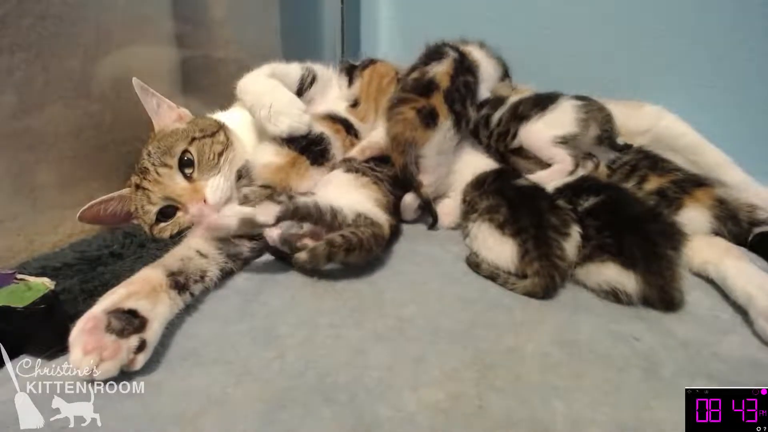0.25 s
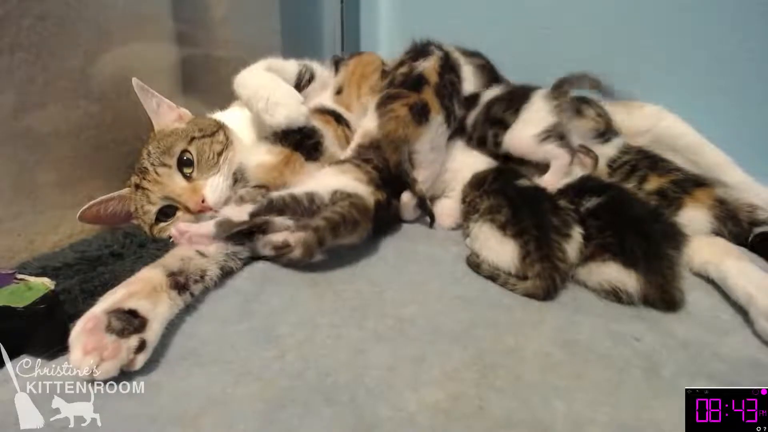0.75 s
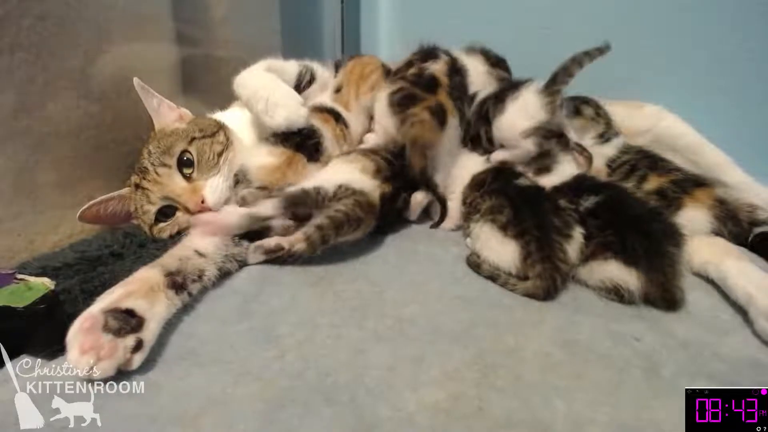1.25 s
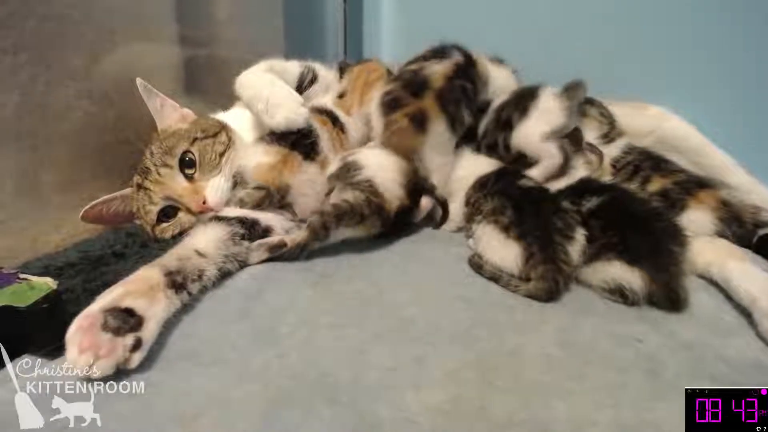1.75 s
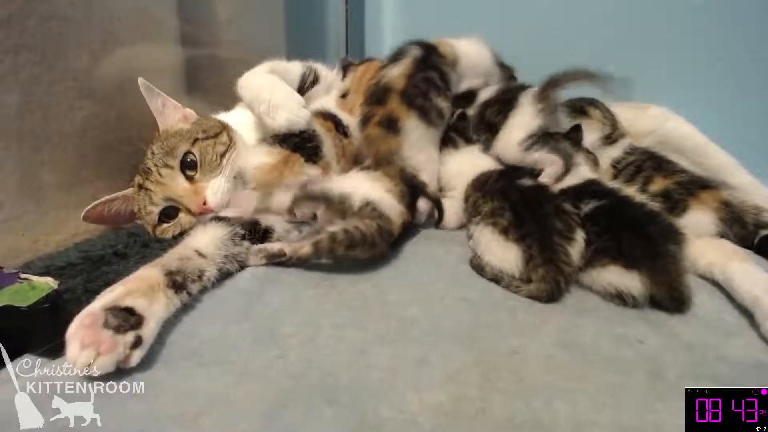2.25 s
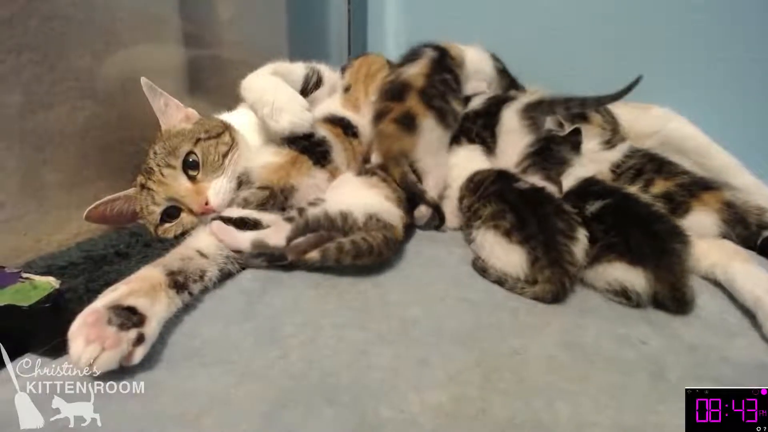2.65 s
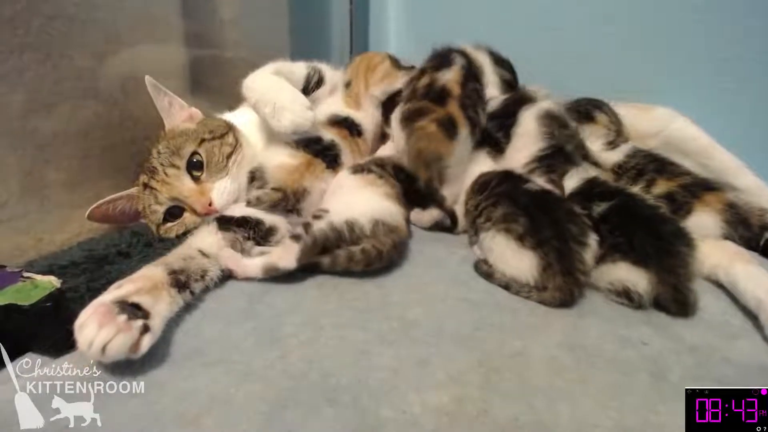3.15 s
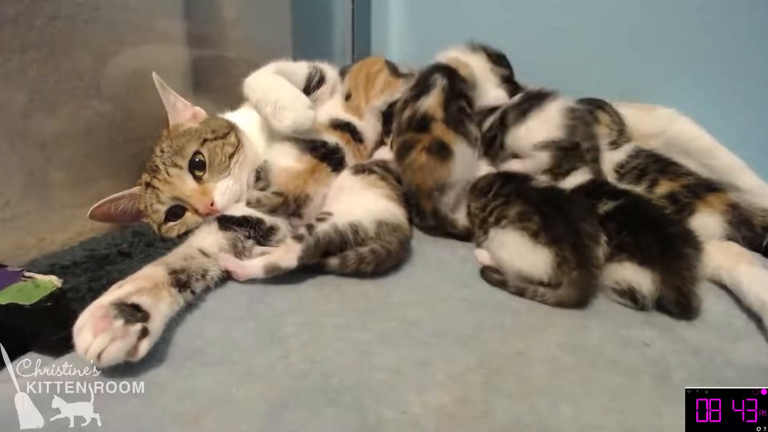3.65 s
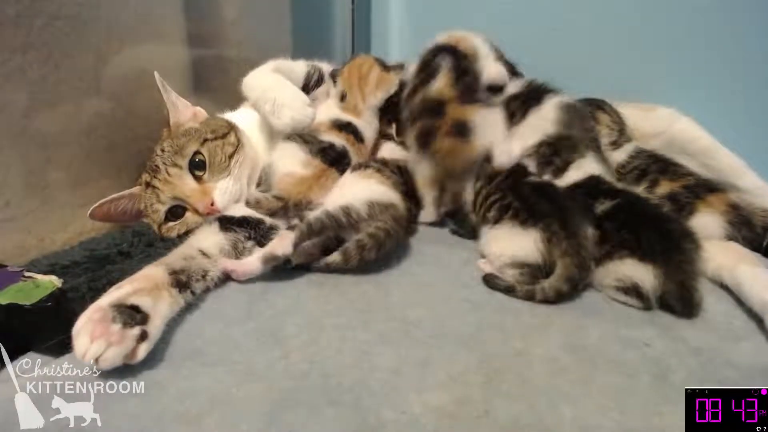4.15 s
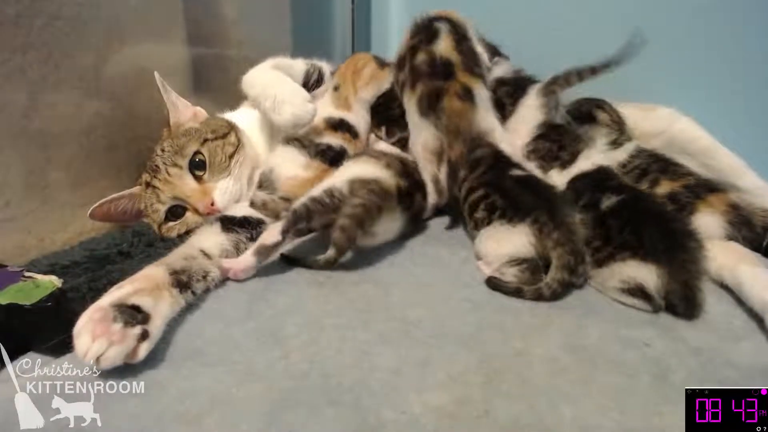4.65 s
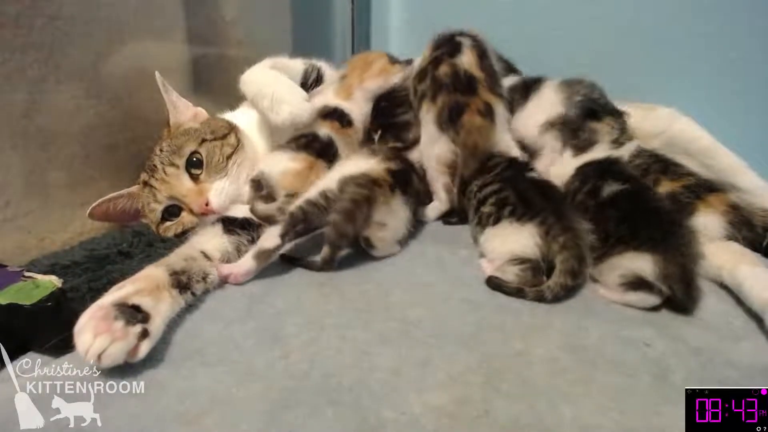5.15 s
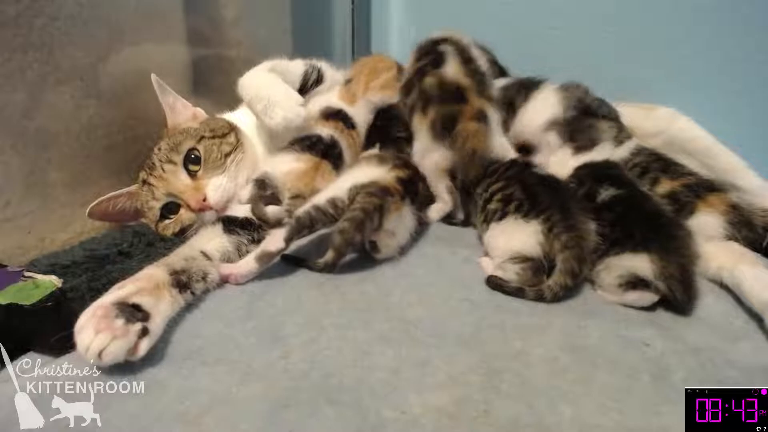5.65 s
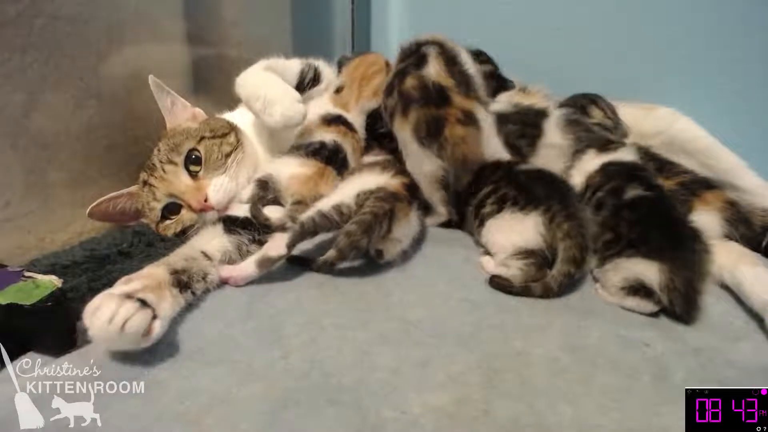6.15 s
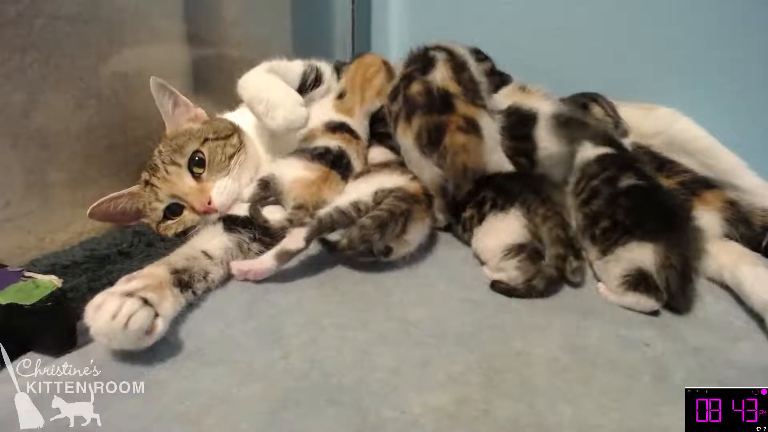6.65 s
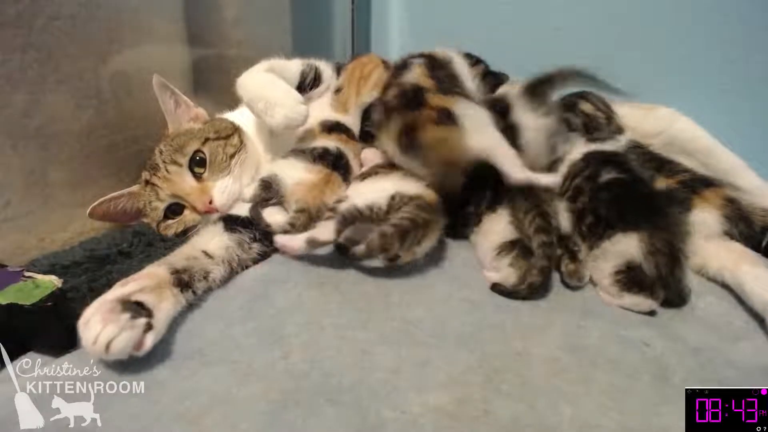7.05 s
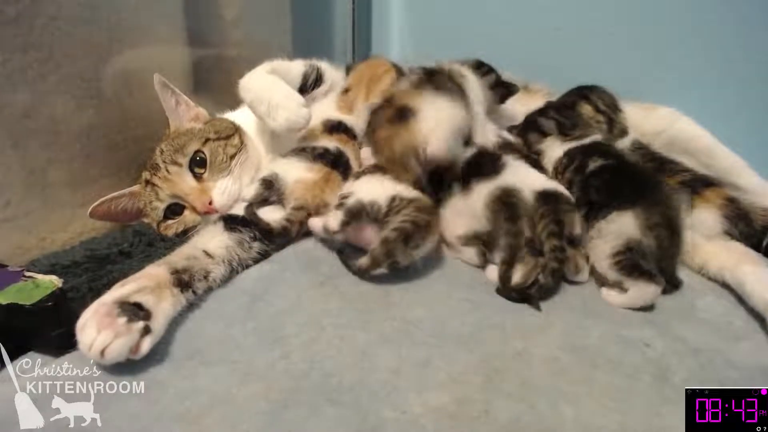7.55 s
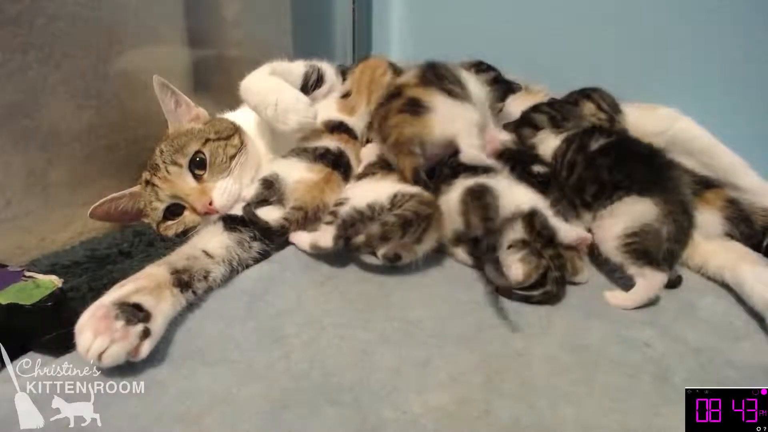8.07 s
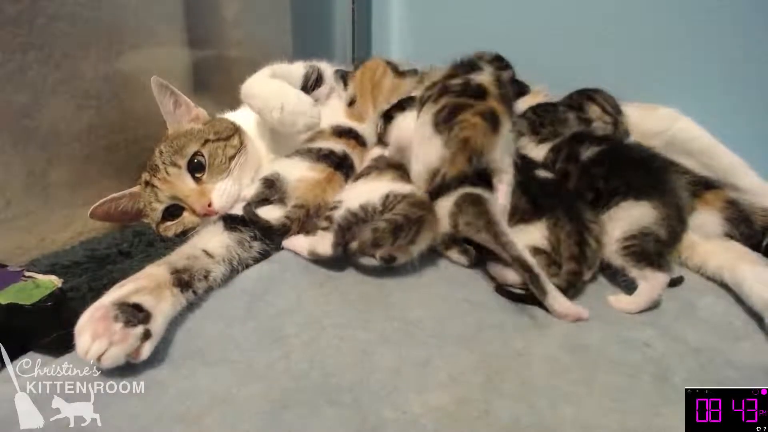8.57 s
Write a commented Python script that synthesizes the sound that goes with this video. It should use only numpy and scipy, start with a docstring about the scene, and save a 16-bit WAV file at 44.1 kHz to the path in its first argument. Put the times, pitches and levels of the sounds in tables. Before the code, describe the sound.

A mother cat purrs deeply and steadily close by in a small quiet room, with two faint kitten squeaks, soft taps and one sharp knock.

```python
"""In a small quiet room a mother cat purrs on a blanket close to the microphone while her kittens nurse.
Her larynx pulses about 25 to 28 times a second, in soft and loud strokes by turns as the air changes direction.
Soft pulses are triple flaps, loud ones single puffs with a ringing chest; filtered noise makes the breath.
The kittens squeak twice as wavering sines, smack with short pulses, and snuffle, puff and rub in bands of noise.
Paws tap and scuff, one sharp knock rings briefly, and sparse reflections and a soft hush make the room."""
import sys
import numpy as np
from scipy import signal
from scipy.fft import rfft, irfft
from scipy.io import wavfile
from scipy.ndimage import uniform_filter1d

SR = 44100
rng = np.random.default_rng(int(sys.argv[2]) if len(sys.argv) > 2 else 0)


def materialize(psi):
    """Save the field psi as 16-bit PCM at rate SR to the path in sys.argv[1].

    A 1-D psi becomes a single channel; in a 2-D psi each row is a channel.
    """
    bounded = np.clip(np.atleast_2d(psi).T, -1, 1)
    quanta = np.round(bounded * 32767).astype(np.int16)
    wavfile.write(sys.argv[1], SR, quanta)


N = 388521
TIME = np.arange(N) / SR  # seconds


def amp(db):
    """Decibels to gain."""
    return 10 ** (np.asarray(db) / 20)


def unit(x):
    """Scales to an rms of 1."""
    return x / np.sqrt(np.mean(x ** 2) + 1e-20)


def crest(x):
    """Scales to a peak of 1."""
    return x / abs(x).max()


def read(points, hz):
    """Reads a table along a log-frequency axis."""
    f, value = np.transpose(points)
    return np.interp(np.log(hz + 1), np.log(f + 1), value)


def add(mix, s, sound):
    """Adds a sound into the mix at a time in seconds."""
    start = round(s * SR)
    sound = sound[max(-start, 0):]
    part = mix[max(start, 0):][:len(sound)]
    part += sound[:len(part)]


def place(s, sound):
    """A silent track with a sound centred on a time in seconds."""
    track = np.zeros(N)
    add(track, s - len(sound) / 2 / SR, sound)
    return track


def noise(colour):
    """Noise of rms 1 with a given spectrum."""
    gain = amp(read(colour, np.fft.rfftfreq(N, 1 / SR)))
    return unit(irfft(rfft(rng.standard_normal(N)) * gain, N))


def cut(x, hz, kind, order):
    """Causal high-pass or low-pass."""
    return signal.sosfilt(signal.butter(order, min(hz, SR / 2 - 1), kind, fs=SR, output="sos"), x)


def above(x, hz):
    """The part of a sound above a frequency."""
    return irfft(rfft(x) * (np.fft.rfftfreq(N, 1 / SR) > hz), N)


def hiss(t, hz, width, grain_db=5.5, grain_hz=110):
    """Grainy hiss of rms 1 through one resonance: slow complex noise shifted up to its centre."""
    a, b, c = rng.standard_normal((3, len(t)))
    slow = cut(a + 1j * b, width / 2, "lowpass", order=3)
    band = (slow * np.exp(2j * np.pi * hz * t)).real
    grain = amp(grain_db * unit(cut(c, grain_hz, "lowpass", order=2)))
    return unit(band * grain)


def pulse(colour, pitch=0.99, lean=0.):
    """One compact pressure pulse of peak 1; pitch scales its spectrum, lean makes one flank stronger."""
    hz = np.fft.rfftfreq(2048, 1 / SR)
    wave = np.fft.fftshift(irfft(amp(read(colour, hz / pitch)) * np.exp(-1j * lean)))
    return crest(wave * np.hanning(len(wave)))


def bounce(s, db, pop, bounce_s=0.00313, bounce_db=-9):
    """A pop and its first reflection off the floor."""
    return amp(db) * (place(s, pop) + amp(bounce_db) * place(s + bounce_s, pop))


def ring(modes, spread):
    """A tenth of a second of a struck body: dying sines, their pitches shifted a little at each blow."""
    t = TIME[:SR // 10]
    total = np.zeros(len(t))
    for hz, db, t60 in modes:
        blow_hz = hz * np.exp(spread * rng.standard_normal())
        total += amp(db - 60 * t / t60) * np.sin(2 * np.pi * blow_hz * t)
    return crest(total)


def stroke(first, last, rate, climb, onset_db, swell_s, fade_db, fade_power):
    """Times and relative dB of the pulses of one stroke: it swells, speeds up a little and fades."""
    count = max(round((last - first) * rate), 1)
    steps = np.r_[0, np.cumsum(1 / np.linspace(1, 1 + climb, count))]
    share = steps / steps[-1]
    t = share * (last - first)
    return zip(first + t, -onset_db * np.exp(-t / swell_s) - fade_db * share ** fade_power)


# Hush of the still room. Each row: frequency in Hz, relative density in dB per Hz.
ROOM_TONE = [(20, -24), (45, -11.5), (100, -5.5), (200, -1.5), (400, -3), (600, -9), (950, -11),
             (1600, -22.5), (2400, -23.5), (3300, -32), (4500, -27), (5600, -31.5), (7300, -34),
             (8200, -45)]


def room_tone(level_db=-72, side_db=-14):
    """Shaped noise as the soft steady hush of the room, a little different in each channel."""
    mid, side = noise(ROOM_TONE), amp(side_db) * noise(ROOM_TONE)
    return amp(level_db) * np.array([mid + side, mid - side])


# Purr cycles, each a soft stroke and then a loud one.
# Each row: the loud stroke's first pulse in seconds, its last pulse in seconds, soft level in dB,
# loud level in dB before the loud purr's trim, fade of the loud stroke in dB.
PURRS = [(0.1204, .507, -42.5, -25.5, 5.5), (0.938, 1.2895, -45, -24.5, 8), (1.7271, 2.079, -45, -23, 11.5),
         (2.545, 2.979, -44.5, -22.5, 18), (3.382, 3.696, -44, -26.5, 5), (4.159, 4.515, -50, -24, 19.5),
         (4.8805, 5.183, -46.5, -25, 16), (5.614, 5.925, -44.5, -21, 15.5),
         (6.3572, 6.744, -49, -23.5, 10.5), (7.212, 7.5636, -48.5, -24.5, 17.5),
         (7.928, 8.28, -44.5, -23, 15.5), (8.7037, 9.045, -43, -22.5, 11.5)]


def soft_spans(rest_after_s=.076, rest_before_s=.039):
    """Soft strokes lie between loud ones, with rests as the air turns: first and last pulse in s, dB."""
    first, last, soft_db = np.transpose(PURRS)[:3]
    return zip(np.r_[0, last[:-1] + rest_after_s], first - rest_before_s, soft_db)


# Spectrum of one flap of a soft pulse, before its pitch. Each row: frequency in Hz, relative level in dB.
SOFT_COLOUR = [(25, -56.5), (50, -35.5), (80, -17), (110, -4), (145, 2.5), (190, -5.5), (260, -14.5),
               (380, -28), (550, -45.5), (1500, -100)]
SOFT_HZ, SOFT_CLIMB = 28.2, 0.018  # mean pulses a second, share by which the rate climbs
SOFT_ONSET_DB, SOFT_SWELL_S, SOFT_FADE_DB, SOFT_FADE_POWER = 6, 0.04, 13.5, 4.6


def soft_purr(tighten=0.22, slip=.1, tension_spread=.09, flap_s=0.00704, flap_db=-2.0, uneven_db=2.0):
    """With the air reversed the folds close loosely: each pulse flaps three times, smaller and tighter."""
    out = np.zeros(N)
    for first, last, db in soft_spans():
        pulses = stroke(first, last, SOFT_HZ, SOFT_CLIMB,
                        SOFT_ONSET_DB, SOFT_SWELL_S, SOFT_FADE_DB, SOFT_FADE_POWER)
        for s, shape_db in pulses:
            size, shape, *slips = rng.standard_normal(5)
            tension = np.exp(tension_spread * shape)  # tenser folds flap faster
            at = s - flap_s / 2
            for k in range(3):
                pitch = tension * np.exp(tighten * k + slip * slips[k])  # no two flaps are alike
                gain = amp(db + shape_db + uneven_db * size + k * flap_db)
                out += place(at, gain * pulse(SOFT_COLOUR, pitch, lean=np.pi / 4))
                at += flap_s / pitch
    return out


NOSE_DB, NOSE_HZ, NOSE_WIDTH_HZ = -78.5, 1168, 420  # resonance, at a stroke of average level
FIZZ_DB, FIZZ_HZ, FIZZ_WIDTH_HZ = -95, 4900, 4000  # thin fizz above it


def nose_air(follow=.9, edge=.4):
    """Air drawn through the mother's nose hisses with each soft stroke, more with the strong ones."""
    out, usual_db = np.zeros(N), np.mean(PURRS, axis=0)[2]
    for first, last, db in soft_spans():
        t = np.arange(first, last, 1 / SR)
        body_gain = amp(NOSE_DB + follow * (db - usual_db))
        body = body_gain * hiss(t, NOSE_HZ, NOSE_WIDTH_HZ, grain_db=7) * np.hanning(len(t))
        fizz = amp(FIZZ_DB) * hiss(t, FIZZ_HZ, FIZZ_WIDTH_HZ, grain_db=4.0)
        add(out, first, body + fizz * signal.windows.tukey(len(t), edge))
    return out


def purr_air(loud, soft, loud_db=-33, soft_db=-27, forcing=1.3):
    """Throat turbulence follows the pulses, steeply in the loud purr; loosely closed folds leak more."""
    # colours of the air: (Hz, relative dB)
    loud_colour = [(200, -20.0), (480, 5.5), (700, -3), (900, -1), (1150, -13.5), (1500, -17.0),
                   (2500, -25.5), (6000, -43)]
    soft_colour = [(200, -14.5), (450, 2), (750, -2.5), (1200, -1), (1800, -14.5), (3200, -21.5),
                   (7000, -26.0)]
    loud_flow, soft_flow = [np.sqrt(abs(uniform_filter1d(x ** 2, size=600))) for x in (loud, soft)]
    forced = loud_flow.max() * crest(loud_flow) ** forcing
    loud_air = amp(loud_db) * forced * noise(loud_colour)
    soft_air = amp(soft_db) * soft_flow * noise(soft_colour)
    return loud_air + soft_air


# Spectrum of one loud pulse, before its pitch. Each row: frequency in Hz, relative level in dB.
PURR_COLOUR = [(25, -46), (45, -43.5), (70, -23.5), (100, -3.5), (130, 0.5), (190, 1.5), (270, 0),
               (350, -7), (430, -8.5), (520, -29.5), (650, -49), (1000, -59.5), (2000, -100)]
# What rings after a pulse in the chest and bedding, before each blow's pitch shift; the thuds use it too.
# Each row: frequency in Hz, relative level in dB, time to die by 60 dB in seconds.
CHEST = [(125, -18, 0.12), (183.1, 2, 0.2), (277, 1, 0.15), (351.6, -6, .04), (418, -17, 0.013)]
LOUD_HZ, LOUD_CLIMB = 25.5, .05  # mean pulses a second, share by which the rate climbs
LOUD_ONSET_DB, LOUD_SWELL_S, LOUD_FADE_POWER = 3.5, 0.005, 3.12


def loud_purr(lean=0.86, ring_db=-19, echo_db=-19, echo_s=.0135, echo_pitch=1.155, uneven_db=1.8,
              level_db=-1, dulling=0.016):
    """Each opening of the larynx puffs, duller when weak; the chest rings and a near surface answers."""
    out = np.zeros(N)
    for first, last, _, loud_db, fade_db in PURRS:
        pulses = stroke(first, last, LOUD_HZ, LOUD_CLIMB,
                        LOUD_ONSET_DB, LOUD_SWELL_S, fade_db, LOUD_FADE_POWER)
        for s, shape_db in pulses:
            size, shape, lag = rng.standard_normal(3)
            db = loud_db + shape_db
            gain = amp(db + level_db + uneven_db * size)
            pitch = np.exp(0.054 * shape + dulling * (db + 22.5))
            puff = gain * pulse(PURR_COLOUR, pitch, lean)
            echo = gain * amp(echo_db) * pulse(PURR_COLOUR, pitch * echo_pitch, lean)
            out -= place(s, puff)  # opposite in sign to its echo
            out += place(s + echo_s + 0.00071 * lag, echo)
            add(out, s + .002, gain * amp(ring_db) * ring(CHEST, spread=0.087))
    return out


# How far the purr, squeaks and smacks lean to the right.
# Each row: frequency in Hz, level in dB of the part that differs between the ears.
PURR_SIDE = [(60, -8.5), (130, -5.5), (300, -10.5), (600, -10.5), (1000, -11), (2000, -18.5)]


def to_the_right(x):
    """A source close on the right: its bass leans most."""
    side = irfft(rfft(x) * amp(read(PURR_SIDE, np.fft.rfftfreq(N, 1 / SR))), N)
    return np.array([x - side, x + side])


# Short swells of hiss: scuffs of paws and fur, puffs of nose air, the breathy onset of a squeak.
# Each row: middle in seconds, length at half height in seconds, level in dB, centre in Hz, width in Hz.
RASPS = [(0.655, .039, -71, 1122, 800), (0.719, 0.031, -79.5, 5480, 2400), (.72, .02, -63.5, 994, 450),
         (0.784, .029, -62, 1017, 810), (1.667, 0.043, -70, 1510, 790), (1.825, .04, -81.5, 5880, 2660),
         (2.215, .04, -77, 2440, 500), (2.264, 0.067, -70, 1182, 250), (4.219, 0.039, -55, 873, 646),
         (4.218, .06, -81, 5000, 1510), (6.789, 0.018, -55.5, 589, 300), (6.837, 0.024, -71, 1400, 1090),
         (7.169, .025, -85, 5870, 3380), (4.569, .018, -64.5, 1190, 600), (7.345, .03, -60, 648, 396),
         (7.694, .05, -71, 1340, 700), (7.717, .02, -69, 5800, 3000)]


def rasps():
    """Short swells of hiss: scuffs of paws and fur, puffs of nose air, the breathy onset of a squeak."""
    out = np.zeros(N)
    for s, length, db, hz, width in RASPS:
        t = np.arange(-length, length, 1 / SR)
        add(out, s - length, amp(db) * hiss(t, hz, width) * np.hanning(len(t)))
    return out


# Dull paw taps. Each row: time in seconds, peak in dB, thud in the bedding in dB before the thuds' lift.
TAPS = [(0.6371, -23.5, -33), (0.717, -53, -38), (0.7742, -29, -31.5), (1.466, -53, -42.5),
        (3.183, -51, -38.5), (3.392, -51.5, -40.5), (6.46, -31, -45), (6.783, -39.5, -43), (6.96, -54, -43),
        (7.682, -57, -42.5)]
# Spectrum of a tap, played 1% lower. Each row: frequency in Hz, relative level in dB.
TAP_COLOUR = [(80, -24.5), (250, 6), (480, 13.5), (780, -4.5), (1000, -18), (1400, -25), (2200, -34.5),
              (3000, -49), (8000, -70.5)]


def paw_taps():
    """A paw lands with one dull pulse, which the floor reflects."""
    return sum(bounce(s, db, pulse(TAP_COLOUR, lean=0.2)) for s, db, _ in TAPS)


def thuds(damping_s=.025, level_db=2, lead_s=.002):
    """Each tap also jolts the mother's flank and the bedding; the resting paw damps the ring."""
    out = np.zeros(N)
    for s, _, db in TAPS:
        body = ring(CHEST, spread=0.071) * np.exp(-TIME[:SR // 10] / damping_s)
        body = cut(cut(body, 110, "highpass", order=3), 420, "lowpass", order=2)
        add(out, s - lead_s, amp(db + level_db) * crest(body))
    return out


# One sharp knock: time in seconds, peak in dB.
KNOCK = (1, -15)
# Spectrum of the knock, played 1% lower. Each row: frequency in Hz, relative level in dB.
KNOCK_COLOUR = [(150, -36), (550, -12.5), (770, 6), (900, -2), (1180, 3), (1550, -1.5), (2000, -13.5),
                (2500, -15.5), (3500, -24.5), (4300, -33), (5300, -28.5), (7000, -49.5), (9000, -47)]


def knock():
    """One sharp pulse and its faint reflection off the floor."""
    return bounce(*KNOCK, pulse(KNOCK_COLOUR, lean=0.73), bounce_db=-20.5)


# What the knocked object rings with.
# Each row: frequency in Hz, relative level in dB, time to die by 60 dB in seconds.
KNOCK_MODES = [(804, -2.5, .14), (1240, -2, .076), (1560, -4, .17), (1780, -19.5, 0.35), (1890, -11, .21)]


def knock_ring(level_db=-40):
    """The modes of the knocked object die away as sines, faded out within a tenth of a second."""
    out = np.zeros(N)
    edges = signal.windows.tukey(SR // 10, .05)
    add(out, KNOCK[0], amp(level_db) * ring(KNOCK_MODES, spread=0) * edges)
    return out


# Smacks of suckling mouths. Each row: time in seconds, peak in dB, pitch factor.
SMACKS = [(2.267, -65, 1.3), (3.263, -48, 1.4), (4.198, -39, 0.77), (4.267, -43.5, 0.99),
          (6.589, -50, 0.47), (6.833, -44, 0.86), (8.1869, -29, 1.03), (8.491, -44.5, 0.79)]
# Spectrum of a smack, before its pitch factor. Each row: frequency in Hz, relative level in dB.
SMACK_COLOUR = [(100, -27.5), (350, 3.5), (600, 12), (1000, 8), (1600, 0), (1900, -30), (2400, -42.5),
                (8000, -65)]


def smacks():
    """Each mouth pops with a pulse at its own pitch, and the floor reflects it."""
    return sum(bounce(s, db, pulse(SMACK_COLOUR, pitch, lean=.4), bounce_db=-16.0) for s, db, pitch in SMACKS)


# A kitten snuffles in the fur.
# Each row: middle in seconds, length at half height in seconds, level in dB of the rasp.
SNUFFLES = [(2.56, .13, -65), (2.76, .3, -71.5), (3.026, 0.099, -64), (3.18, .05, -67), (3.27, .1, -61),
            (3.554, .06, -69.5)]
SNUFFLE_HZ, SNUFFLE_WIDTH_HZ = 1452, 460  # resonance of its nose


def snuffles(fizz_db=-22, fizz_hz=4750, fizz_width_hz=4000):
    """A kitten roots for a teat: swells of rasp through its nose, with a little fizz above."""
    out = np.zeros(N)
    for s, length, db in SNUFFLES:
        t = np.arange(-length, length, 1 / SR)
        rasp = hiss(t, SNUFFLE_HZ, SNUFFLE_WIDTH_HZ, grain_db=4)
        fizz = amp(fizz_db) * hiss(t, fizz_hz, fizz_width_hz, grain_db=2.5)
        add(out, s - length, amp(db) * (rasp + fizz) * np.hanning(len(t)))
    return out


# Kitten squeaks, one list for each.
# Each row: time in seconds, pitch in Hz before its waver, level in dB.
SQUEAKS = [
    [(3.255, 836, -51.5), (3.291, 966, -47.5), (3.347, 931, -50.5), (3.461, 994, -52), (3.517, 1218, -56),
     (3.535, 1176, -75)],
    [(4.565, 815, -55), (4.587, 795, -51.5), (4.615, 670, -54), (4.651, 660, -56.5), (4.775, 971, -59.5),
     (4.785, 1018, -67)],
]


def squeaks(waver=.012):
    """Thin, pure whistles: gliding sines whose pitch shakes by a small share."""
    out = np.zeros(N)
    for rows in SQUEAKS:
        s, hz, db = np.transpose(rows)
        t = np.arange(s[0], s[-1], 1 / SR)
        shake = unit(cut(rng.standard_normal(len(t)), 110, "lowpass", order=2))
        pitch = np.interp(t, s, hz) * (1 + waver * shake)
        tone = np.sin(2 * np.pi * np.cumsum(pitch) / SR)
        edges = signal.windows.tukey(len(t), .06)
        add(out, s[0], amp(np.interp(t, s, db)) * unit(tone) * edges)
    return out


# A kitten tumbles and slides over fur.
# Each row: time in seconds, level in dB before the rub's lift and lightening.
RUB = [(7.19, -99.5), (7.204, -63), (7.228, -87), (7.242, -70), (7.29, -56.5), (7.316, -55), (7.52, -83.5)]
# Colour of the rub. Each row: frequency in Hz, relative level in dB.
RUB_COLOUR = [(300, -8), (600, -6.5), (950, 0), (1150, -23.5), (1500, -6), (1700, -4), (1900, 3.5),
              (2150, -6.5), (2600, -25.5), (3700, -16.5), (4500, -10.5), (5400, -16), (6400, -33.5),
              (8000, -61)]


def fur_rub(level_db=3, grain_db=3, body_hz=3000, lighten_db_per_s=60):
    """Hairs catch and slip as a kitten slides down; as its weight comes off, the body dies before the hiss."""
    s, db = np.transpose(RUB)
    catches = amp(grain_db * unit(cut(rng.standard_normal(N), 200, "lowpass", order=2)))
    rub = unit(noise(RUB_COLOUR) * catches)
    treble = above(rub, body_hz)
    middle_s = np.average(s, weights=amp(db))  # the weight lifts from here on
    weight = amp(-lighten_db_per_s * np.maximum(TIME - middle_s, 0))
    level = amp(np.interp(TIME, s, db, left=-140, right=-140) + level_db)
    return level * (treble + weight * (rub - treble))


# Wet lip clicks. Each row: time in seconds, peak in dB.
LIP_CLICKS = [(7.7280, -38.5), (7.7296, -33.5), (7.741, -46.5), (7.752, -50), (7.767, -55.5)]
# Spectrum of a click, played 1% lower. Each row: frequency in Hz, relative level in dB.
LIP_COLOUR = [(500, -4), (800, 4), (1100, -30), (1700, -6), (2100, -14), (2450, 0), (3000, -23),
              (4000, -9.5), (4700, -3), (5100, 9), (5600, -6), (6300, -8.5), (6950, 5), (7600, -9),
              (9000, -47)]


def lip_clicks(decay_s=0.0023):
    """Bright wet ticks: a film of milk bursts and rings in a tiny mouth."""
    out, t = np.zeros(N), TIME[:SR // 40]
    for s, db in LIP_CLICKS:
        burst = rng.standard_normal(len(t)) * np.exp(-t / decay_s)
        click = crest(signal.fftconvolve(burst, pulse(LIP_COLOUR)))
        out += place(s + t[-1] / 2, amp(db) * click)  # the burst starts at s
    return out


# Decay of the room. Each row: frequency in Hz, time to die by 60 dB in seconds.
ROOM_DECAY = [(200, 0.083), (1000, 0.14), (3000, .2), (7000, 0.06)]


def room(x, apart=0.12):
    """Scattered reflections of a small room, each band dying at its own speed, nearly alike in both channels."""
    shape = (2, SR // 2)
    taps = rng.standard_normal(shape) * (rng.random(shape) < .1) * (TIME[:SR // 2] > .004)
    hz, t, z = signal.stft(taps, SR, nperseg=256)
    decay = amp(-60 * t / read(ROOM_DECAY, hz)[:, None])
    mid, side = signal.istft(z * decay, SR, nperseg=256)[1]
    tails = np.array([mid + apart * side, mid - apart * side]) / np.linalg.norm(mid)
    return signal.fftconvolve(x[None], tails, axes=1)[:, :N]


def scene(tap_room_db=-12, smack_room_db=-18, knock_room_db=-6, lip_room_db=-11, kitten_room_db=-11,
          rub_room_db=-15, purr_room_db=-24):
    """The purr, nose air, squeaks and smacks lie close and to the right; all other sources are central."""
    soft, loud = soft_purr(), loud_purr()
    purr = loud + soft + purr_air(loud, soft)
    # each source with the share of it that the room returns
    right = [(purr, purr_room_db), (smacks(), smack_room_db), (squeaks(), kitten_room_db)]
    centre = [(rasps() + snuffles(), kitten_room_db), (paw_taps(), tap_room_db),
              (knock() + knock_ring(), knock_room_db), (fur_rub(), rub_room_db), (lip_clicks(), lip_room_db)]
    echoes = room(sum(amp(db) * x for x, db in right + centre))
    near_right = to_the_right(sum(x for x, _ in right) + nose_air())
    return near_right + sum(x for x, _ in centre) + thuds() + echoes + room_tone()


def record(dry, edge_hz=8500):
    """The deepest bass is thinned away; then the recorder's band limit."""
    thinned = cut(dry, 30, "highpass", order=2)
    band_limit = signal.firwin(255, edge_hz, window=("kaiser", 9), fs=SR)
    return signal.oaconvolve(thinned, band_limit[None], "same")


dry = scene()
out = record(dry)
materialize(out)
```